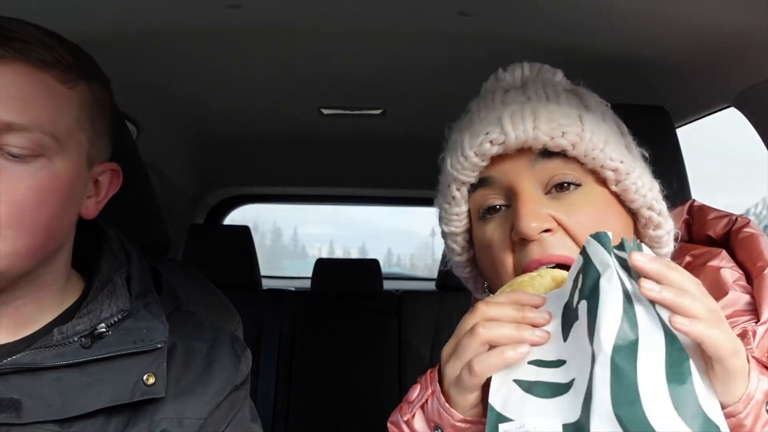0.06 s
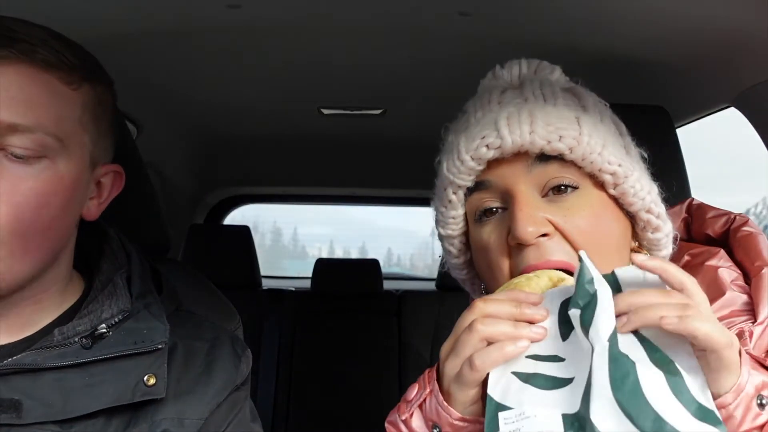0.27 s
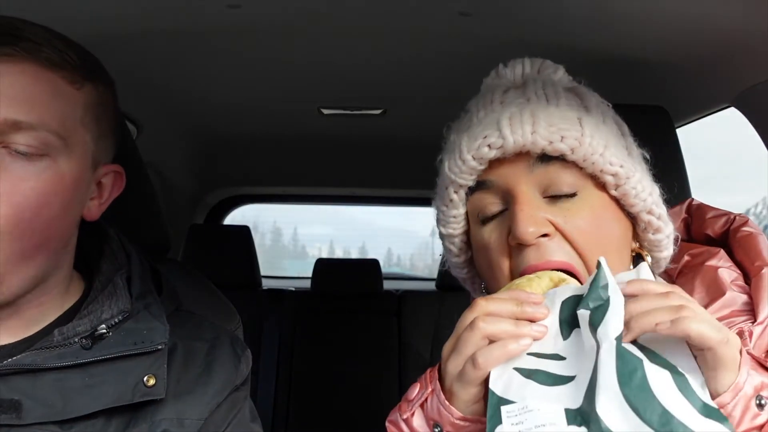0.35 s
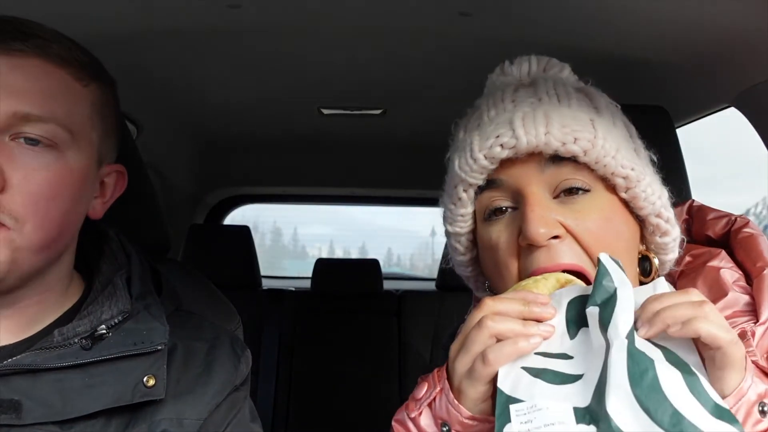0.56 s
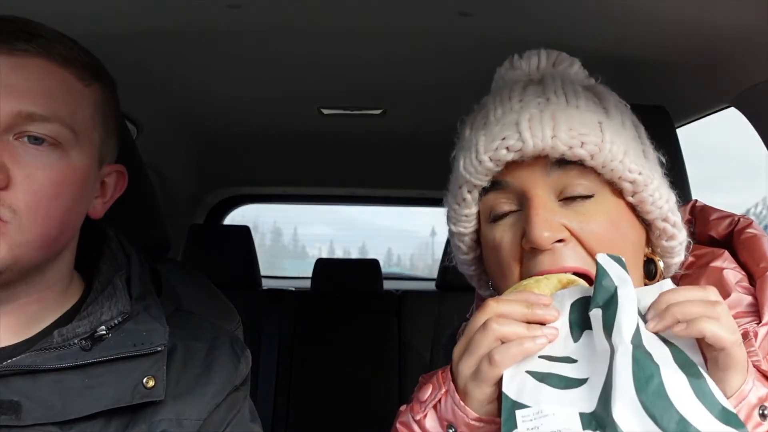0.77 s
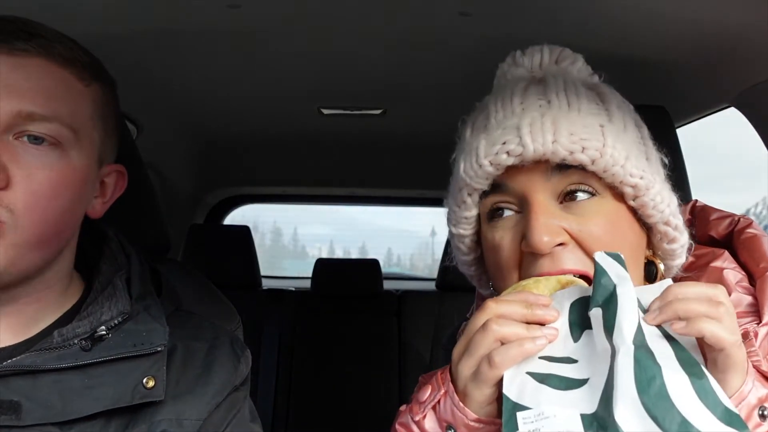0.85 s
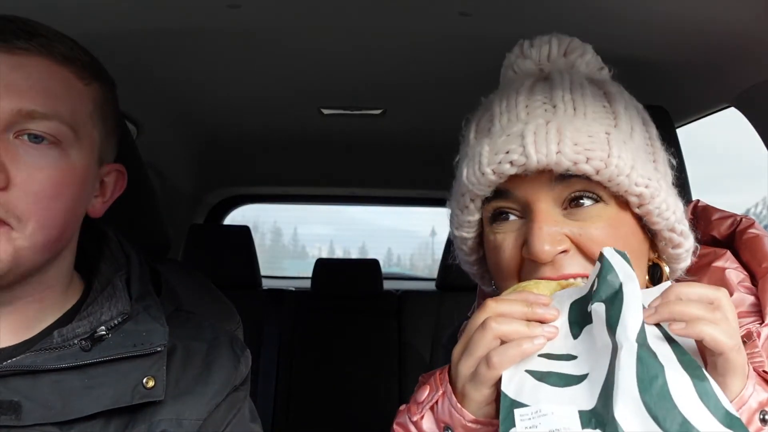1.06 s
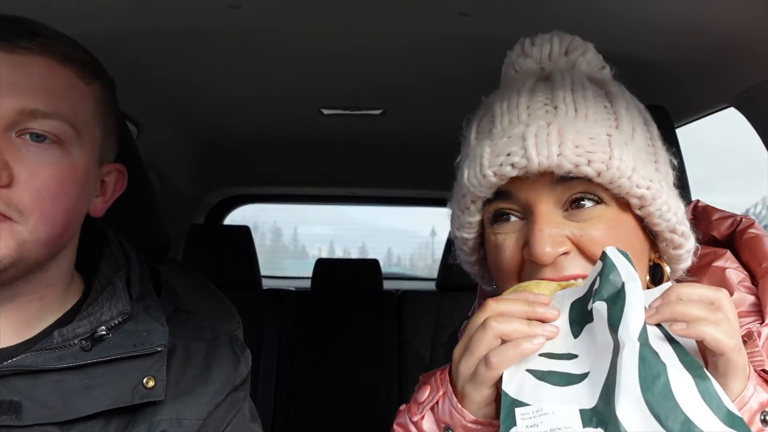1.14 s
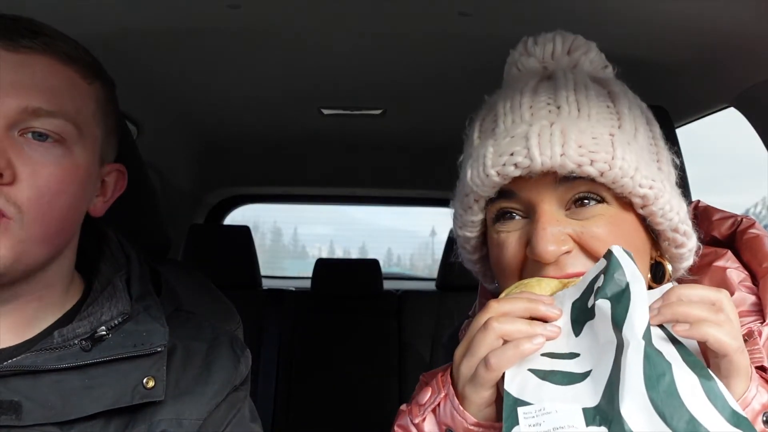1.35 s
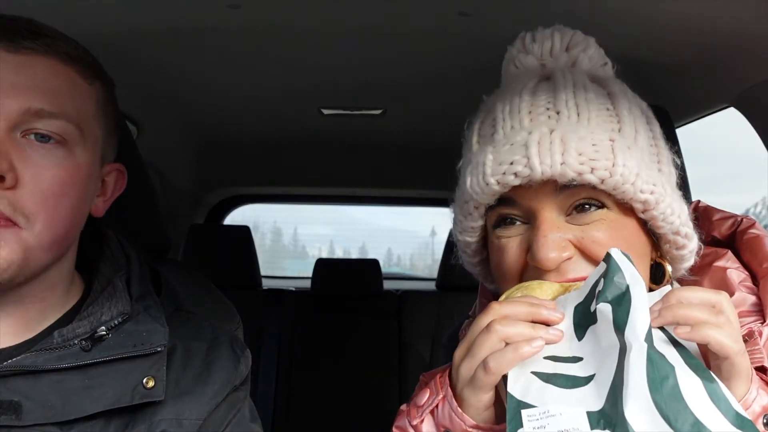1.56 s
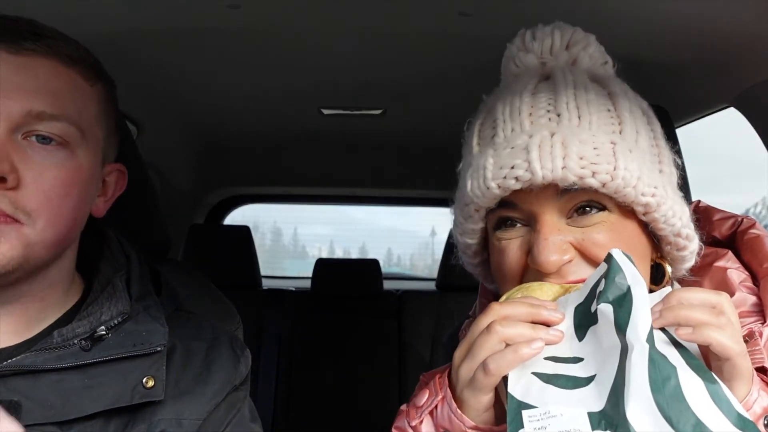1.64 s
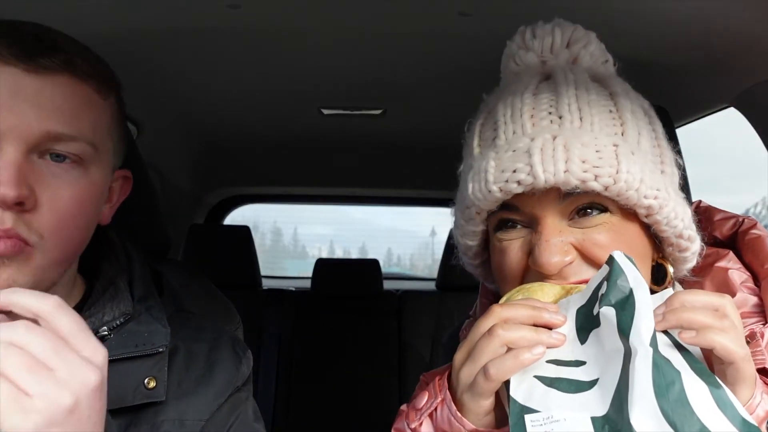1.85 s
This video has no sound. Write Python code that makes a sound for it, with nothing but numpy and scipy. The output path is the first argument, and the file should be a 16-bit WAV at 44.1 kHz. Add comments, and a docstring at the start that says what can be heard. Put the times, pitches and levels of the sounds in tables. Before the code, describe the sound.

Crisp paper bag crumpling close by in a small car cabin, fading to light rustles and a bite

```python
"""Inside a parked car, a little to the right, a paper food bag is squeezed and shifted in the hands.
Creases snap as short noise bursts through ringing facets, over showers of random tiny buckles.
A bite gives a few duller crunches with fine crackle; a jacket sleeve swishes as shaped noise.
The small padded cabin adds a short, dense tail to snaps, crumpling and bite; faint air noise lies below."""
import sys
import numpy as np
from scipy import signal
from scipy.fft import rfft, irfft
from scipy.io import wavfile
from scipy.ndimage import uniform_filter1d

SR = 44100
rng = np.random.default_rng(int(sys.argv[2]) if len(sys.argv) > 2 else 0)


def dump_mix(stems):
    """Bounce the given channels to the path in sys.argv[1] as a 16-bit WAV at rate SR."""
    frames = np.atleast_2d(stems).T  # one column per channel
    limited = np.clip(frames, -1, 1)  # hard clip at full scale
    pcm = np.round(limited * 32767).astype(np.int16)
    wavfile.write(sys.argv[1], SR, pcm)


N = 83790
SIZE = 8192  # samples in a response

# All event levels are before pan; pan_db is left minus right.

# creases snapping [start_s, level_db, ring_hz]
CREASE_SNAPS = [(.0185, -48, 3200), (.0425, -37, 3080), (.0505, -39.5, 7600), (.1275, -38, 6500),
                (.2155, -24.5, 5140), (.2422, -23, 6900), (.2472, -27, 5760), (.2510, -24.5, 5030),
                (.2635, -25.5, 2000), (.2980, -24, 7200), (.3185, -28.5, 1690), (.3240, -22, 9200),
                (.3452, -23.5, 7240), (.3850, -26.5, 7060), (.3905, -31, 1990), (.4150, -35.5, 8900),
                (.4440, -23.5, 7100), (.4780, -36, 2000), (.5052, -34, 5900), (.5142, -42.5, 7000),
                (.5212, -31, 5700), (.5365, -31.5, 4140), (.5580, -32.5, 2110), (.5738, -36, 2130),
                (.6090, -41, 9000), (.6212, -26, 8500), (.6345, -32, 3650), (.6578, -33.5, 6500),
                (.6675, -24, 4180), (.6930, -40.5, 1550), (.7412, -32, 5200), (.8015, -37, 4100),
                (.8353, -26.5, 5900), (.8628, -26, 5940), (.8830, -30, 4500), (.9857, -48, 6840),
                (1.0348, -33.5, 6600), (1.0552, -40, 7660), (1.0708, -36, 3700), (1.0910, -43, 2670),
                (1.0985, -40.5, 7700), (1.1350, -45.5, 1640), (1.1500, -40, 6700), (1.1942, -38, 3200),
                (1.2045, -41.5, 3430), (1.2260, -39.5, 1410), (1.2495, -43, 1450), (1.2992, -41, 5840),
                (1.3540, -44.5, 1650), (1.3763, -36, 3440), (1.7580, -41.5, 4200)]
# bag wall flexing with a soft hollow pop [start_s, level_db, ring_hz]
WALL_FLEXES = [(.0440, -50, 667), (.2660, -38.5, 534), (.8353, -59, 546)]
# spells of crumpling [start_s, end_s, start_level_db, end_level_db]
SQUEEZE_SPELLS = [(0, .142, -39, -40), (.172, .216, -44, -29), (.218, .25, -27, -20.5),
                  (.25, .324, -22.5, -24), (.33, .392, -27.5, -28), (.41, .428, -36, -32.5),
                  (.448, .482, -32, -30.5), (.488, .582, -38.5, -34), (.608, .642, -35.5, -32.5),
                  (.652, .704, -69, -35), (.715, .83, -46, -39), (.858, .892, -32.5, -40),
                  (.92, 1.025, -56.5, -41), (1.03, 1.104, -44, -40), (1.16, 1.275, -50, -43.5),
                  (1.28, 1.42, -83, -50), (1.44, 1.625, -45, -50), (1.637, 1.7, -42, -67)]
# paper colour [freq_hz, gain_db]
PAPER_COLOUR = [(59, -73), (140, -43), (403, -20.5), (530, -17), (640, -22), (936, -17), (1090, -11.5),
                (1210, -14.5), (1400, -1.5), (1550, 1), (1840, -7), (2090, 0.5), (2750, -7), (3540, 2),
                (4370, -4), (7100, -1.5), (15500, -9.5)]
# bag wall colour [freq_hz, gain_db]
WALL_COLOUR = [(150, -36.5), (520, 0), (850, -8), (2000, -15)]
BUCKLES_PER_S, BAG_PAN_DB = 950, -2.5
SNAP_WET_DB = -2.5  # reflections, against those of the crumpling


def bag():
    """Creases snap over the crumpling of the paper; now and then the wall flexes."""
    tail = cabin()
    creases = snaps(CREASE_SNAPS, PAPER_COLOUR, cabin(), SNAP_WET_DB)
    flexes = snaps(WALL_FLEXES, WALL_COLOUR, tail)
    crumpling = crumple(SQUEEZE_SPELLS, PAPER_COLOUR, tail, BUCKLES_PER_S)
    return (creases + flexes + crumpling) * pan(BAG_PAN_DB)


# crunches of the bite [start_s, level_db, ring_hz]
BITE_CRUNCHES = [(1.4362, -36, 3650), (1.4465, -39.5, 2400), (1.4622, -27, 3870), (1.4660, -40, 4030),
                 (1.4740, -47, 1530), (1.5390, -38, 3020), (1.6495, -41, 2870), (1.6780, -45, 3600),
                 (1.7125, -43.5, 3420)]
# spells of fine crackle [start_s, end_s, start_level_db, end_level_db]
CRACKLE_SPELLS = [(1.4, 1.495, -48.5, -52.5), (1.51, 1.595, -44, -50.5)]
# food colour [freq_hz, gain_db]
FOOD_COLOUR = [(100, -59), (500, -29), (1050, -42), (1420, -11), (2000, -12), (3650, 1), (4300, -8),
               (4900, -13.5), (6300, -12.5), (9000, -28), (15500, -37)]
CRACKLES_PER_S, BITE_PAN_DB = 1300, -1.5
BITE_WET_DB = -8  # reflections of the crunches, against those of the crackle


def bite():
    """Food breaks in duller crunches, with fine crackle about them."""
    tail = cabin()
    crunches = snaps(BITE_CRUNCHES, FOOD_COLOUR, tail, BITE_WET_DB)
    crackle = crumple(CRACKLE_SPELLS, FOOD_COLOUR, tail, CRACKLES_PER_S)
    return (crunches + crackle) * pan(BITE_PAN_DB)


# swishes [start_s, end_s, start_level_db, end_level_db]
SLEEVE_SWISHES = [(1.68, 1.772, -49, -47), (1.776, 1.9, -42, -48.5)]
# cloth colour [freq_hz, gain_db]
CLOTH_COLOUR = [(88, -48), (352, -18.5), (1240, -12), (1600, -0.5), (2020, -10.5), (2920, -1.5),
                (15500, -7.5)]
SLEEVE_PAN_DB = 0.5


def sleeve():
    """Jacket cloth slides as an arm is raised: coloured noise under the effort."""
    return hiss(CLOTH_COLOUR) * effort(SLEEVE_SWISHES) * pan(SLEEVE_PAN_DB)


# air colour [freq_hz, gain_db]
AIR_COLOUR = [(30, -37), (480, -24), (750, -17), (1450, -4), (2000, -8.5), (3600, -5.5), (15500, -21.5)]
AIR_DB = -55.5


def air():
    """Still air of the cabin: steady coloured noise."""
    return undb(AIR_DB) * hiss(AIR_COLOUR)


SNAP_SPAN_S = 0.0085  # time over which a snap's level is taken


def snaps(rows, colour, tail, wet_db=0):
    """Single cracks, each through its own facet and from its own spot."""
    out = np.zeros((2, N + SIZE))
    for start_s, level_db, ring_hz in rows:
        snap = through(crack(), facet(colour, ring_hz))
        heard = through(snap, paths(tail, wet_db))
        i = int(start_s * SR)
        out[:, i:i + SIZE] += unit(heard) * undb(level_db) * np.sqrt(2 * SNAP_SPAN_S * SR)
    return out[:, :N]


CRACK_DECAY_S, CRACK_EVEN = 0.00038, 0.3  # time constant; share of the chance colour (dB) removed


def crack():
    """A burst about a millisecond long whose chance colour is partly evened out."""
    burst = rng.standard_normal(SIZE) * np.exp(-np.arange(SIZE) / SR / CRACK_DECAY_S)
    chance_db = 20 * np.log10(np.abs(rfft(burst)))
    return through(burst, response(-CRACK_EVEN * chance_db))


FACET_LOW_HZ, FACET_HIGH_HZ, MIDDLE_FACET_HZ = 1316, 9700, 4440
FACET_DB, FACET_WIDTH_HZ = 6, 900  # lift at the ring; width of the ring at MIDDLE_FACET_HZ
SMALL_TILT_DB_PER_OCTAVE = 2.1  # limit for small facets; large ones tilt the other way
FOLD_SHIFT = 0.02  # largest shift of the colour, as a fraction of frequency


def facet(colour, ring_hz):
    """One patch giving way: the material's colour shifted a little by the fold, with a short ring."""
    smallness = ring_hz / MIDDLE_FACET_HZ
    width_hz = FACET_WIDTH_HZ * smallness ** 1.5  # small facets are more damped
    ring_db = FACET_DB / (1 + (2 * (bins() - ring_hz) / width_hz) ** 2)
    octaves = np.log2(np.maximum(bins(), FACET_LOW_HZ) / ring_hz)
    tilt_db = SMALL_TILT_DB_PER_OCTAVE * (1 - 1 / smallness) * octaves
    folded = np.array(colour) * [1 + FOLD_SHIFT * rng.uniform(-1, 1), 1]
    return response(along(folded) + ring_db + tilt_db)


BUCKLE_SPREAD_DB, WANDER_DB, STEADY_S = 5.5, 4, 0.015


def crumple(spells, colour, tail, rate_per_s, count=14):
    """Uneven tiny buckles passed among several facets; the effort is held over STEADY_S."""
    uneven_db = BUCKLE_SPREAD_DB * np.clip(rng.standard_normal((count, N)), -2, 2)
    strain_db = WANDER_DB * wander(count)
    sign = rng.choice([-1, 1], (count, N))
    fires = rng.random((count, N)) < rate_per_s / count / SR
    clicks = undb(uneven_db + strain_db) * sign * fires
    power = uniform_filter1d(np.sum(clicks ** 2, axis=0), int(STEADY_S * SR))
    clicks = clicks * effort(spells) / np.sqrt(np.abs(power) + 1e-6)
    out = np.zeros((2, N))
    for row, ring_hz in zip(clicks, np.geomspace(FACET_LOW_HZ, FACET_HIGH_HZ, count)):
        heard = through(paths(tail), facet(colour, ring_hz))
        out += through(row, np.sqrt(2) * unit(heard))
    return out


WANDER_PER_S = 60


def wander(count):
    """Random curves by which the strain moves from facet to facet."""
    steps = np.arange(N) / SR * WANDER_PER_S
    rows = rng.standard_normal((count, SIZE))
    return np.array([np.interp(steps, np.arange(SIZE), row) for row in rows])


ATTACK_S, RELEASE_S = 0.0026, 0.0021  # time constants, before the start and after the end


def effort(spells):
    """Each spell comes in quickly, swells or eases, and lets go; powers add."""
    t, power = np.arange(N) / SR, 0
    for start_s, end_s, start_db, end_db in spells:
        rise = np.minimum(t - start_s, 0) / ATTACK_S
        fall = np.maximum(t - end_s, 0) / RELEASE_S
        level = undb(np.interp(t, [start_s, end_s], [start_db, end_db]))
        power = power + (np.exp(rise - fall) * level) ** 2
    return np.sqrt(power)


def hiss(colour):
    """Smooth stereo noise of a given colour."""
    noise = spread(*rng.standard_normal((2, N)))
    return through(noise, unit(response(along(colour))))


CABIN_DB, EARLY_DB = 6.5, 3.5  # energy against the direct sound, before wet_db
EARLY_T60_S = 0.019  # off hands, face and the bag itself


def paths(tail, wet_db=0):
    """From one spot: direct sound, early reflections that differ per spot, then the cabin's tail."""
    parts = []
    for part in tail:
        early = unit(rng.standard_normal(SIZE) * fade(EARLY_T60_S))
        parts.append(undb(CABIN_DB) * unit(part) + undb(EARLY_DB) * early)
    ir = undb(wet_db) * spread(*parts)
    ir[:, 0] += 1  # direct
    return ir


CABIN_T60_S, CABIN_LOW_T60_S, CABIN_SPLIT_HZ = 0.072, 0.13, 1750


def cabin():
    """The cabin's tail from one seat, as mid and side: decaying noise whose lows last longer."""
    bands = []
    for kind in ("low", "high"):
        sos = signal.butter(2, CABIN_SPLIT_HZ, kind, fs=SR, output="sos")
        bands.append(signal.sosfilt(sos, rng.standard_normal((2, SIZE))))
    low, high = bands
    return low * fade(CABIN_LOW_T60_S) + high * fade(CABIN_T60_S)


def fade(t60_s):
    """A decay of 60 dB in the given time."""
    return np.exp(-np.log(1000) * np.arange(SIZE) / SR / t60_s)


# stereo width, side over mid [freq_hz, gain_db]
SIDE_WIDTH = [(200, -18.5), (1300, -10), (2500, -9.5), (12000, -8)]


def spread(mid, side):
    """Left and right from two unrelated sounds, wider in the treble."""
    return mid + through(side, response(along(SIDE_WIDTH))) * np.array([[1], [-1]])


def pan(db):
    """Left and right gains from their level difference."""
    return undb(np.array([[db], [-db]]) / 2)


def through(x, ir):
    """Play a sound through an impulse response by convolution."""
    return signal.fftconvolve(np.atleast_2d(x), np.atleast_2d(ir), axes=-1)[:, :np.shape(x)[-1]]


def response(db):
    """Causal minimum-phase impulse response with the given gains, by folding the cepstrum."""
    cep = irfft(np.log(undb(db)))
    cep[1:SIZE // 2] *= 2
    cep[SIZE // 2 + 1:] = 0
    return irfft(np.exp(rfft(cep)))


def along(points):
    """A (freq_hz, gain_db) table read at every bin, on a log frequency axis."""
    hz, db = np.array(points, float).T
    return np.interp(np.log(bins()), np.log(hz), db)


def bins():
    """Frequencies of a response's spectrum in Hz, with 0 Hz raised to the first bin."""
    return np.maximum(np.arange(SIZE // 2 + 1), 1) * SR / SIZE


def unit(x):
    """Scale to an energy of one."""
    return x / np.sqrt(np.sum(x ** 2))


def undb(db):
    """Amplitude gain from dB."""
    return 10 ** (np.asarray(db) / 20)


def scene():
    """Bag, bite and sleeve over the still air of the cabin."""
    return bag() + bite() + sleeve() + air()


TOP_HZ = 15900


def record(dry):
    """The recorder cuts the top with a steep elliptic low-pass."""
    sos = signal.ellip(10, 0.2, 80, TOP_HZ, fs=SR, output="sos")  # order, ripple dB, stopband dB
    return signal.sosfilt(sos, dry)


dry = scene()
out = record(dry)
dump_mix(out)
```